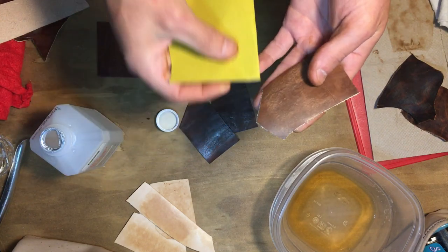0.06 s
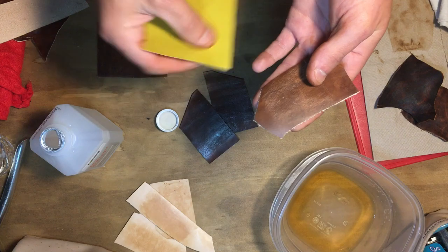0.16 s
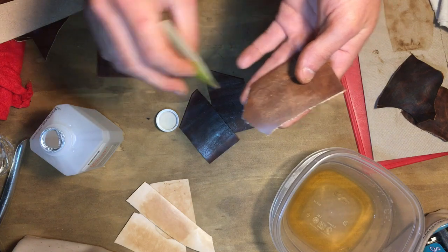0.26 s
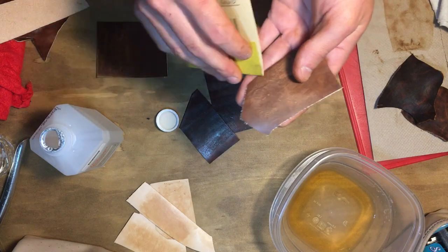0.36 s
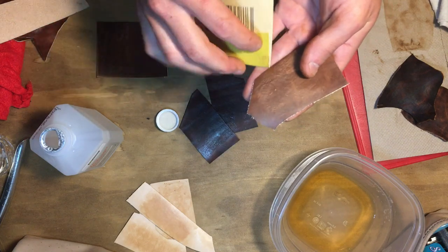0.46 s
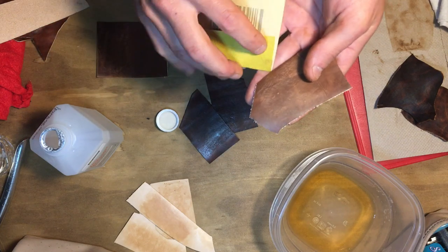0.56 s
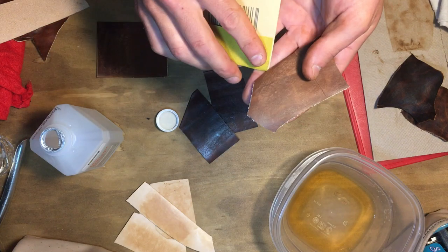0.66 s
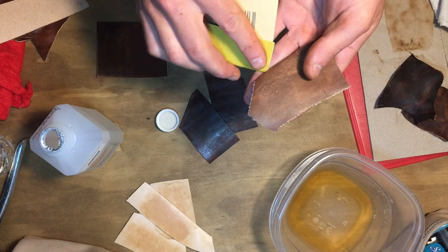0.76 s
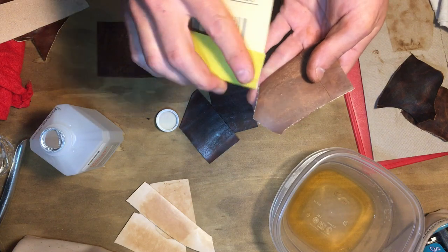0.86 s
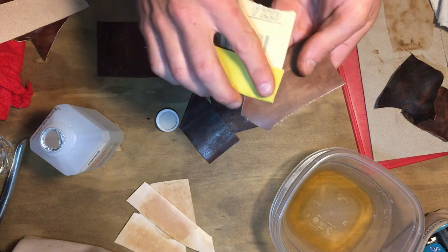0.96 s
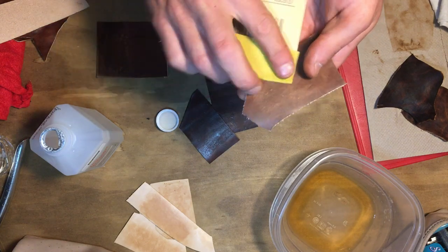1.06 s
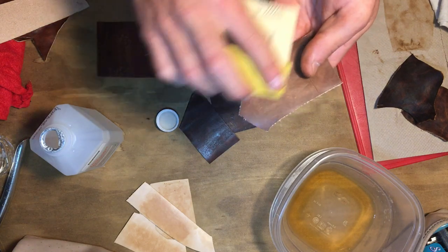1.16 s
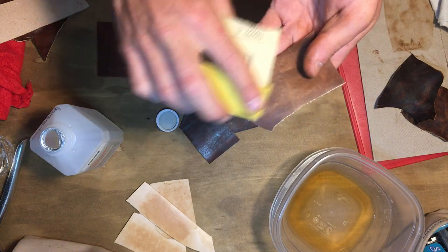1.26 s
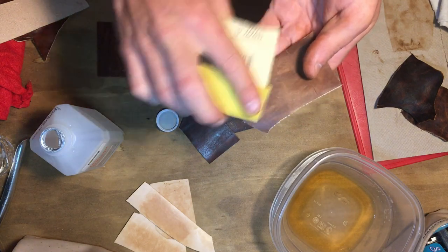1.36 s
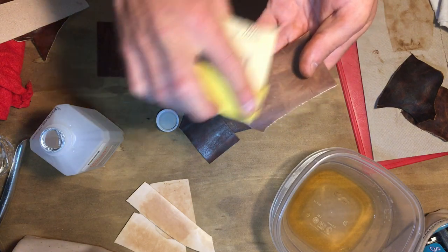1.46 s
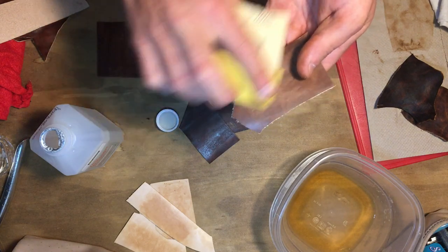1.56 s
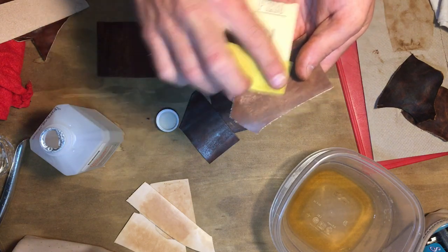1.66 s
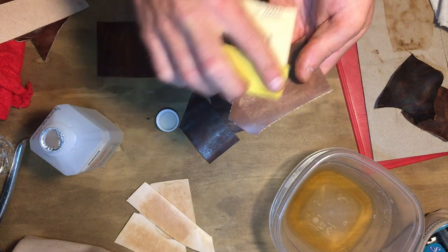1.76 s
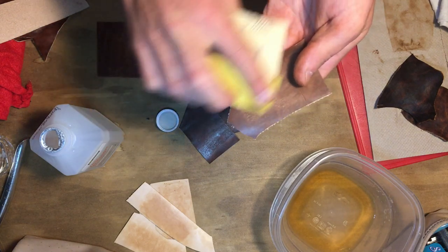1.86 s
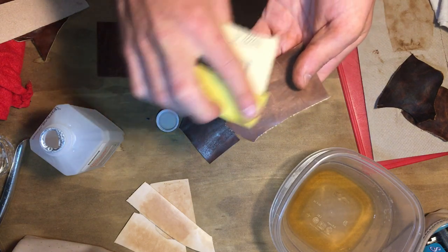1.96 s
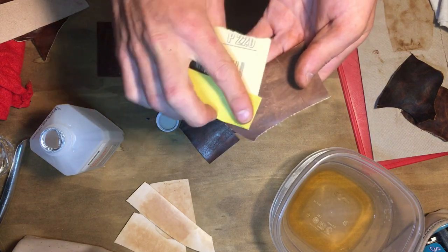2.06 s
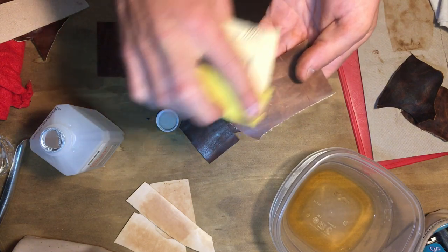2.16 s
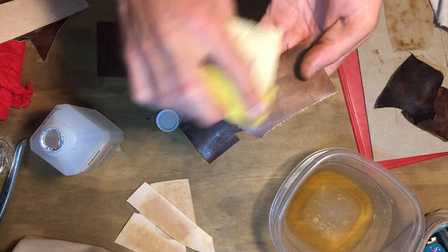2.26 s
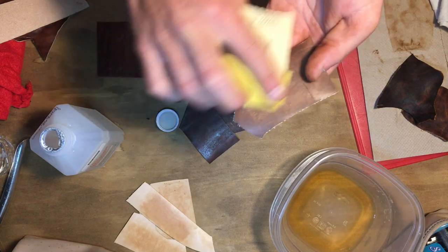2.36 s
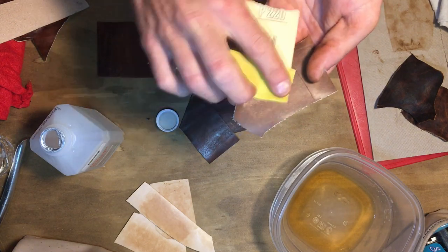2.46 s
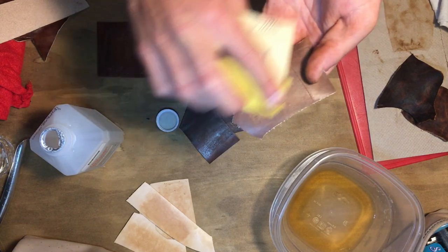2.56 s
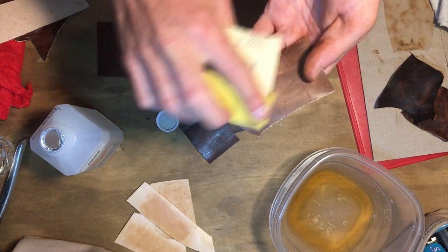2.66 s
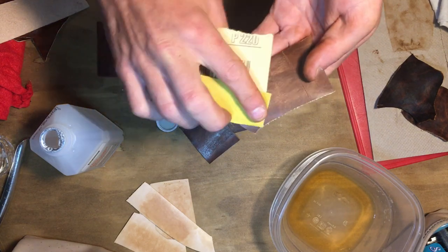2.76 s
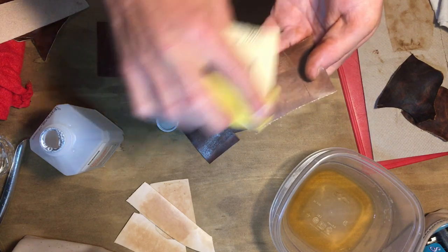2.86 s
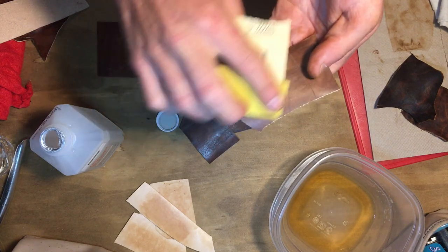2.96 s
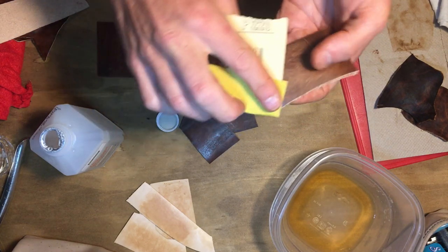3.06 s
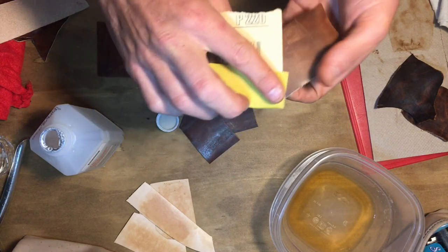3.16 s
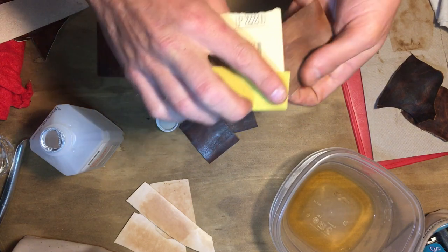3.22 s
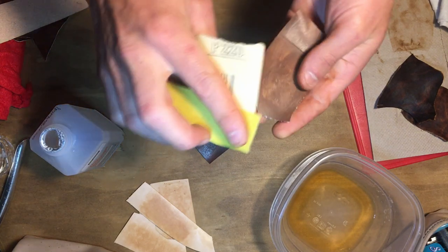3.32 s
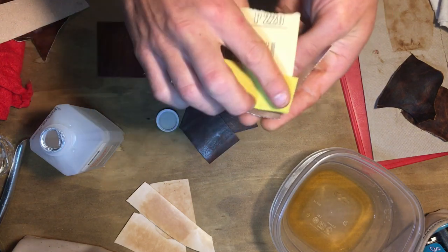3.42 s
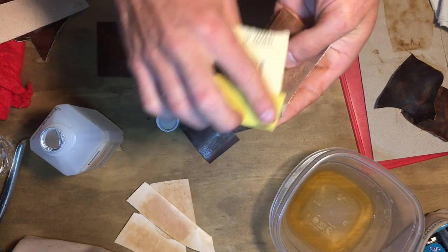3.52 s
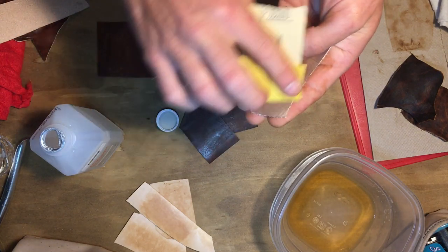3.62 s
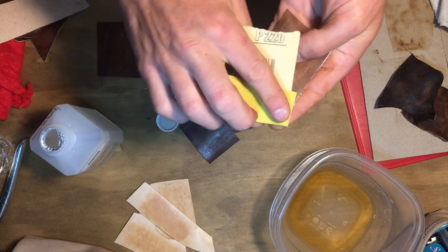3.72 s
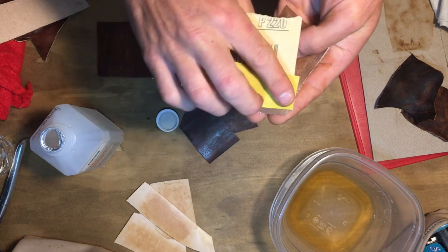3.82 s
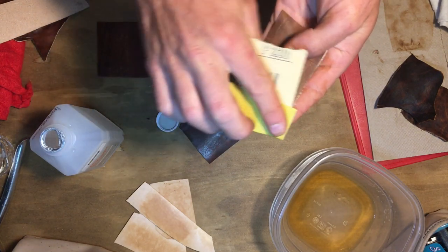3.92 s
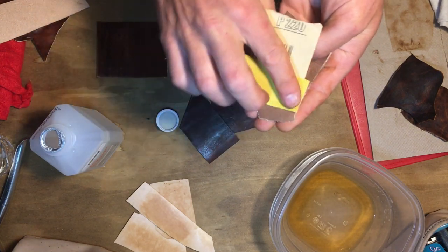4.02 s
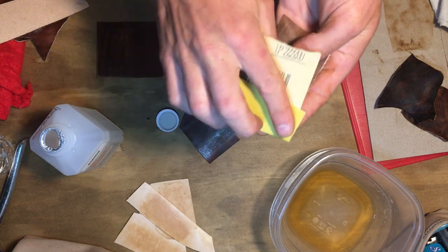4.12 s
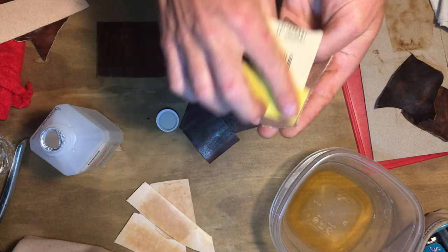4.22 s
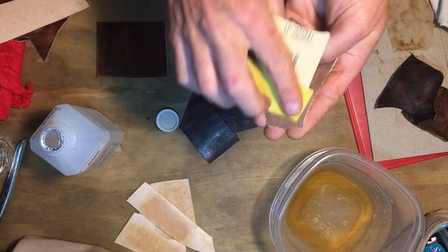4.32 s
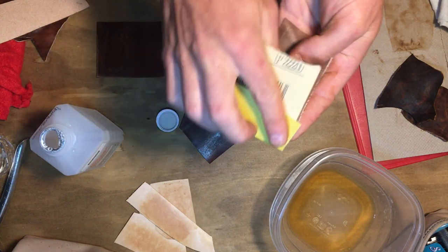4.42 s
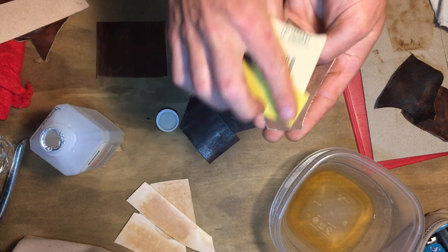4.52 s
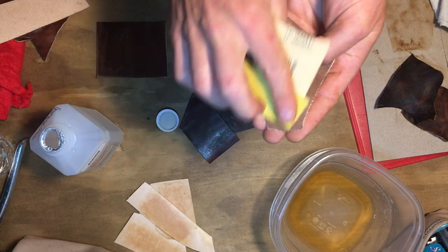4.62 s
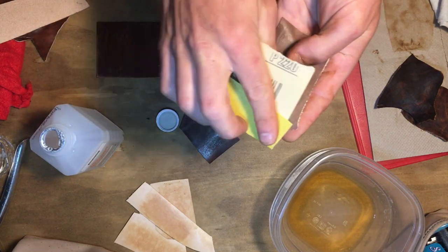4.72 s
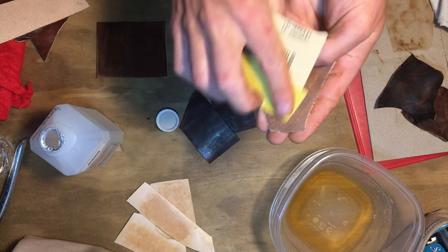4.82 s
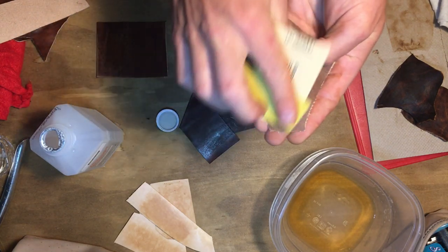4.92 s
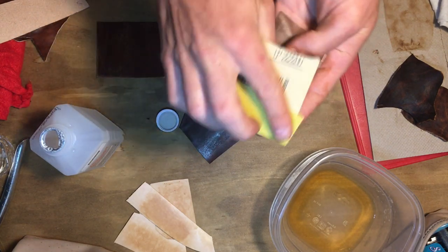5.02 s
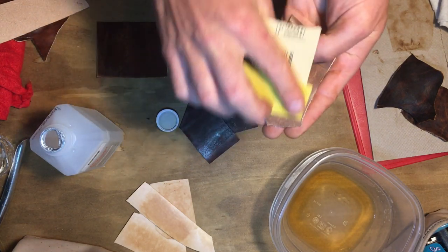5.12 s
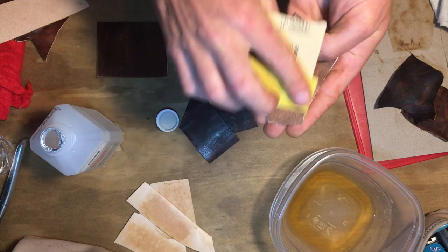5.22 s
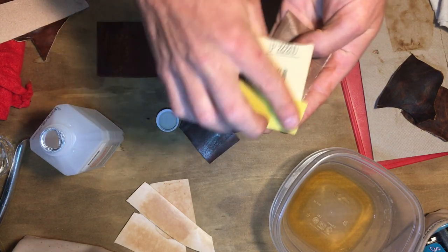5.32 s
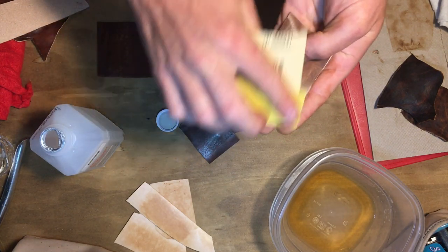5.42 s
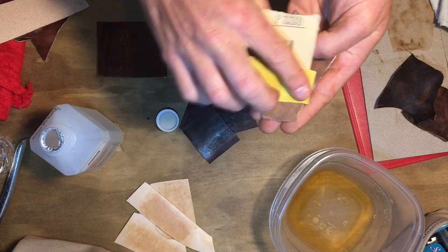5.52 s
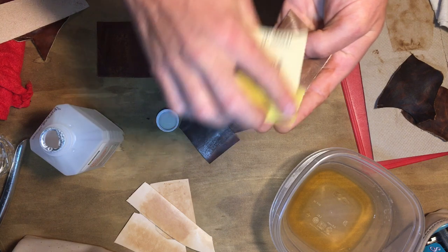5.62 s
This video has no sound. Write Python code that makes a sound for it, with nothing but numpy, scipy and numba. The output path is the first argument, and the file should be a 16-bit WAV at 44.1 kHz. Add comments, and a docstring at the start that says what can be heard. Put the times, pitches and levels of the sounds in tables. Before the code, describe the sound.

Sandpaper scrubs a piece of leather by hand in two quick runs, a bright dry hiss and then a slightly duller rasp.

```python
"""Folded sandpaper scrubs quickly over a hand-held piece of leather: a bright hiss on its face, then a
duller rasp on its edge. Countless grit impacts follow the speed of each stroke and ring the sheet.
Before each run the sheet is regripped: fingers brush it, it crinkles and slips, a loose corner buzzes.
Leather and hands knock softly at the turns. A small quiet workroom, heard from just above the bench."""
import sys
import numpy as np
from scipy import signal
from scipy.fft import rfft, irfft
from scipy.io import wavfile
from numba import njit

SR = 44100
rng = np.random.default_rng(int(sys.argv[2]) if len(sys.argv) > 2 else 0)


def unload_wav(signal):
    """Save mono or channel-first audio to the path in sys.argv[1] as 16-bit WAV at rate SR, clipped to [-1, 1]."""
    wavfile.write(
        sys.argv[1],
        SR,
        np.round(np.clip(np.atleast_2d(signal).T, -1, 1) * 32767).astype(np.int16),
    )


N = 250488
TIME = np.arange(N) / SR

# Fingers brush the sheet. Each row: start and end in seconds, level in dB, push, brightness in dB.
# Push runs from -1 to 1; above 0 the speed peaks early. Levels are set before each layer's trim.
BRUSHES = [(-.05, .14, -53, -0.013, 3.5), (.09, .2, -60.5, .1, -4), (.18, .298, -62, -0.35, 1),
           (.368, .532, -49.5, 0.31, 1), (.455, .492, -49.5, .4, -1), (.498, .526, -53.5, -.3, 5.5),
           (.524, .665, -49, 0.22, -1.5), (.661, .694, -48, 0.51, 9.5), (3.632, 3.672, -42.5, 0.26, -3)]
# The sheet crinkles in the grip. Each row: start in seconds, level in dB, brightness in dB.
CRINKLES = [(.013, -52, -12), (0.1, -55, 7.5), (0.231, -68, 2), (0.351, -59.5, 8), (.373, -49.5, 8),
            (.443, -50, 1), (.646, -44.5, 7)]
# The sheet slips on the leather. Each row: as for a brush, then its loose corner's pitch in Hz.
SLIPS = [(0.643, 0.862, -68, .1, 10.5, 5360), (0.73, 0.964, -69, -0.45, 7, 2260),
         (0.842, 0.886, -44, 0.39, 1.5, 2160), (0.918, 0.968, -59.5, .07, 11.5, 2400),
         (0.993, 1.046, -55, 0.22, 11, 2420), (3.047, 3.183, -65.5, .27, 13, 2470),
         (3.18, 3.253, -65.5, -.18, 8, 2170), (3.259, 3.317, -65, -0.26, 12, 2540),
         (3.288, 3.319, -47, 0, 8, 2520), (3.31, 3.59, -74.5, 0.022, 9, 3030),
         (3.488, 3.503, -58.5, .37, 2, 2420), (3.727, 3.779, -59.5, .45, 13, 2370)]
# Hand and leather knock. Each row: start in seconds, level in dB, weight in dB gained per octave down.
KNOCKS = [(0.65, -52, -11), (0.717, -58.5, -8), (0.851, -53, -4), (1.007, -56, -5), (1.072, -47.5, -13),
          (3.638, -58, -8), (3.832, -54.5, 0.5)]
# Modes of the held leather, highest first. Each row: pitch in Hz, level in dB.
LEATHER_MODES = [(368.6, -3), (204, -2), (120, -4)]

# Spells of scrubbing: even on the face, quickening on the edge but for one hesitation.
# Each row: start and end in seconds, rough tempo in strokes per second.
FACE_SPELLS = [(1.058, 1.488, 16.4), (1.489, 2.177, 17.4), (2.177, 2.650, 16.9), (2.650, 3.053, 17.4)]
EDGE_SPELLS = [(4.085, 4.257, 11.6), (4.257, 4.570, 12.7), (4.570, 5.091, 13.4), (5.091, 5.175, 12),
               (5.175, 5.724, 14.5)]
# How hard the hand bears down. Each row: time in seconds, level in dB, brightness in dB.
FACE_EFFORT = [(1.095, -37, -3.5), (1.15, -33.5, 0.5), (1.52, -35, 3), (2.09, -36, 2), (2.27, -36, 2.2),
               (2.38, -33.2, 1.7), (2.62, -35, 1.6), (2.84, -38, 1.5), (2.91, -35, 2), (2.97, -37, 0.5),
               (3.03, -37, -1.5)]
EDGE_EFFORT = [(4.12, -36.5, -4), (4.22, -37, -1.5), (4.45, -35, -2), (4.63, -39, -1), (4.8, -37, 1.8),
               (4.98, -36.5, -3.5), (5.06, -33.5, .5), (5.13, -35.5, -2.5), (5.21, -38, -1.5),
               (5.35, -35.5, 2), (5.43, -37.5, 1.4), (5.68, -32.3, -3.5)]
# The forward stroke, then the pull. Each row: pause before it in seconds, level offset in dB, push,
# brightness offset in dB.
FACE_PUSH_PULL = [(0.0022, 0.7, 0.1, 0.74), (0.00086, 0.5, 0.041, 1.3)]
EDGE_PUSH_PULL = [(0.00716, 0.46, 0.28, 1.3), (0.0021, -0.5, 0.0049, 1.5)]
# Single strokes find the edge before the rhythm sets in.
# Each row: start and end in seconds, level in dB, push, brightness in dB.
TRIAL_STROKES = [(3.548, 3.616, -38, -0.61, 0), (3.621, 3.677, -31.5, 0.49, 2.5),
                 (3.679, 3.744, -33.5, 0.14, 0.9), (3.816, 3.883, -45, 0.59, 6.5),
                 (3.903, 3.973, -36.5, -0.18, -2.2), (3.982, 4.074, -35.5, -0.23, -1.5)]

# Broad tone of the still room and of the sheet in each grip. Each row: frequency in Hz, gain in dB.
ROOM_COLOUR = [(20, -10), (45, -2.5), (80, -4), (125, 1), (170, -9.5), (300, -13), (600, -22.5),
               (1500, -21), (4000, -23), (9000, -30.5), (15500, -34)]
BRUSH_COLOUR = [(60, -19), (250, -6), (390, -1.5), (500, -9), (680, -9.5), (850, -10), (1700, -0.5),
                (2100, -3), (4200, -5.5), (5500, -9), (8800, -16.5), (12500, -15), (15600, -28)]
SLIP_COLOUR = [(120, -28), (200, -24), (350, -1.5), (470, -30), (700, -21), (820, -3), (1560, -1.5),
               (2380, -1.5), (3900, -1), (4400, -7.5), (6600, -14), (10200, -23), (12000, -20),
               (15500, -31)]
FACE_COLOUR = [(60, -48), (250, -27.5), (390, -13.5), (500, -32), (680, -35), (850, -17.5), (1700, -8.5),
               (2100, 2.5), (4200, -5), (5500, -3.5), (8800, -7.5), (12500, -12.5), (15600, -21)]
EDGE_COLOUR = [(60, -58), (250, -26.5), (390, -15), (500, -30.5), (680, -28.5), (850, -18.5), (1700, -11.5),
               (2100, 1), (4200, -6), (5500, -8), (8800, -11.5), (12500, -16.5), (15600, -23.5)]
# Resonances of the sheet and dips between the hands. Each row: centre and width in Hz, gain in dB.
BRUSH_PEAKS = [(975, 250, 7.1), (1310, 84, 5), (1980, 110, 2.9), (2490, 230, 3.9), (3280, 340, 4.8),
               (4120, 120, 7.1)]
SLIP_PEAKS = [(1986, 100, 10.5), (2390, 180, -4.5), (3300, 300, 1), (3720, 83, 3.5)]
FACE_PEAKS = [(1307, 75, 6.2), (1653, 120, -2.4), (1830, 106, -8), (2142, 168, -9.8), (2420, 90, 1.5),
              (2575, 73, -7.4), (2945, 61, -3.8), (3217, 58, 3.5), (3315, 51, -6), (4062, 431, 4),
              (4966, 188, -6), (5397, 509, -3.8), (6348, 178, -3)]
EDGE_PEAKS = [(1067, 48, -4.3), (1328, 74, 4.7), (1837, 64, -4.8), (2166, 130, -6.9), (2547, 144, -4.6),
              (2949, 57, -3.3), (3983, 100, 3), (4294, 110, 3.8), (4924, 310, -3.7), (5227, 101, 3.3),
              (6199, 91, -3.5)]
# The notch of the microphone port. Its one row: centre and width in Hz, gain in dB.
PORT_DIP = [(10270, 670, -6)]


def undb(db):
    """Decibels to gain."""
    return 10 ** (np.asarray(db) / 20)


def unit(x):
    """Scale to rms 1."""
    return x / np.sqrt(np.mean(x ** 2))


def add(out, start_s, sound):
    """Mix a sound in at start_s."""
    i = int(start_s * SR)
    out[i:i + len(sound)] += sound[:max(N - i, 0)]


def lowpass(x, hz, order=2):
    """Low-pass without delay, so that the rest of x is the matching high-pass."""
    return signal.sosfiltfilt(signal.butter(order, min(hz, SR / 2 - 1), fs=SR, output="sos"), x)


@njit
def resonator(x, hz, width_hz):
    """Band-pass whose centre may move every sample; gain 1 at the centre."""
    y, band, low = np.empty(len(x)), 0., 0.
    for i in range(len(x)):
        tuning, damping = np.tan(np.pi * hz[i] / SR), width_hz / hz[i]
        swing = (band + tuning * (x[i] + 1e-18 - low)) / (1 + tuning * (tuning + damping))
        band = 2 * swing - band
        low += 2 * tuning * swing
        y[i] = damping * swing
    return y


def ring(x, colour, peaks=(), size=8192):
    """Pass x through a body of unit power with a broad colour and narrow peaks or dips."""
    hz = np.maximum(np.arange(size // 2 + 1) * SR / size, 1)
    colour_hz, colour_db = np.array(colour).T
    db = np.interp(np.log(hz), np.log(colour_hz), colour_db)
    for centre, width, height in peaks:
        db += height * np.exp(-2 * ((hz - centre) / width) ** 2)
    # minimum phase: the body rings only after it is struck
    cepstrum = irfft(np.log(undb(db)))
    cepstrum[1:size // 2] *= 2
    cepstrum[size // 2 + 1:] = 0
    response = irfft(np.exp(rfft(cepstrum)))
    return signal.fftconvolve(x, response / np.linalg.norm(response))[:N]


def wander(rate):
    """A random drift with a spread near 1, turning rate times a second."""
    return np.interp(TIME * rate, np.arange(N), rng.standard_normal(N))


def grit(rate, spread_db):
    """Grains catch at random, rate times a second; a positive spread makes a few much harder."""
    caught = rng.random(N) < rate / SR
    return unit(caught * rng.standard_normal(N) * undb(spread_db * rng.exponential(size=N)))


def rub(strokes, impacts, speed_powers, catch_db, overrun_s):
    """Each stroke speeds up and stops; slow sliding is dull, fast sliding snaps the fibres sharply."""
    low = lowpass(impacts, hz=1700, order=6)
    top = impacts - lowpass(impacts, hz=5200)
    mid = impacts - low - top
    low_power, mid_power, top_power = speed_powers
    out = np.zeros(N)
    for start, end, db, push, bright_db in strokes:
        start, end = start - overrun_s, end + overrun_s  # the soft sheet creeps beyond the hand's travel
        on = (TIME > start) & (TIME < end)
        progress = (TIME[on] - start) / (end - start)
        speed = np.abs(np.sin(np.pi * (progress + push * progress * (1 - progress))))
        bite = np.sin(np.pi / 2 * speed) ** 2  # the grains bite once sliding, then the drag levels off
        body = low[on] * bite ** low_power + mid[on] * bite ** mid_power
        sizzle = undb(bright_db) * top[on] * bite ** top_power
        out[on] += undb(db) * (body + sizzle)
    return out * undb(catch_db * wander(260))  # the drag is never even along a stroke


def room_tone(rumble_db=-67, hum_hz=125.7, hum_db=-78):
    """Low room rumble with a faint mains hum."""
    rumble = unit(ring(rng.standard_normal(N), ROOM_COLOUR)) * undb(0.23 * wander(4.7))
    hum = np.sqrt(2) * np.sin(2 * np.pi * hum_hz * TIME)
    return undb(rumble_db) * rumble + undb(hum_db) * hum


def regripping(crinkle_s=.018, crinkle_push=.25):
    """Fingers slide over the sheet, and its creases crinkle in short bursts."""
    crinkles = [(start, start + crinkle_s, db, crinkle_push, bright) for start, db, bright in CRINKLES]
    creases = grit(rate=12000, spread_db=1.9)
    drag = rub(BRUSHES + crinkles, creases, speed_powers=(.67, .88, .96), catch_db=1.5, overrun_s=.0005)
    return undb(-2) * ring(drag, BRUSH_COLOUR, BRUSH_PEAKS)


def sheet_slips():
    """The sheet settles on the leather in small gritty jerks."""
    jerks = [slip[:-1] for slip in SLIPS]
    grains = grit(rate=11000, spread_db=-1.2)
    drag = rub(jerks, grains, speed_powers=(.42, .69, .98), catch_db=-1, overrun_s=.001)
    return undb(-1.5) * ring(drag, SLIP_COLOUR, SLIP_PEAKS)


def corner_buzz(pushes, width_hz=600., slip_db=-1, push_db=-11, push_hz=4050, push_s=.029):
    """Grit rings a loose corner of the sheet through each slip, and briefly as a push meets the edge."""
    buzzes = [(start, end, db + slip_db, hz) for start, end, db, _, _, hz in SLIPS]
    buzzes += [(start, start + push_s, db + push_db, push_hz) for start, _, db, _, _ in pushes]
    grains = grit(rate=3000, spread_db=2)
    out = np.zeros(N)
    for start, end, db, hz in buzzes:
        on = (TIME > start) & (TIME < end)
        pitch = np.full(on.sum(), float(hz))
        corner = resonator(resonator(grains[on], pitch, width_hz), pitch, width_hz)
        swell = np.sin(np.pi * (TIME[on] - start) / (end - start))
        out[on] += undb(db) * swell * unit(corner)
    return out


def thud(hz, rise_s, decay_s):
    """One damped, slightly ragged mode of leather bumping on fingers."""
    t = TIME[:SR // 8]
    stray = np.cumsum(rng.standard_normal(len(t))) * np.sqrt(170 / SR)  # soft contact blurs the pitch
    swell = (1 - np.exp(-t / rise_s)) * np.exp(-t / decay_s)
    return np.sqrt(2) * np.sin(2 * np.pi * hz * t + stray) * swell / swell.max()


def leather_knocks(strokes, turn_db=-33, turn_hz=385, turn_lag_s=.00895):
    """The leather bumps the fingers when pressed down, and lightly as each stroke takes hold."""
    out = np.zeros(N)
    for start, db, weight in KNOCKS:
        for hz, mode_db in LEATHER_MODES:
            octaves_down = np.log2(LEATHER_MODES[0][0] / hz)
            gain = undb(db + mode_db + weight * octaves_down)
            add(out, start, gain * thud(hz, rise_s=.0007, decay_s=.019))
    for start, _, db, _, _ in strokes:
        add(out, start + turn_lag_s, undb(db + turn_db) * thud(turn_hz, rise_s=.00078, decay_s=.0034))
    return out


def scrub_strokes(spells, effort, push_pull, level_scatter_db=.7, push_scatter=.11, top_scatter_db=1.06):
    """The hand goes back and forth at each spell's tempo, no two strokes quite alike."""
    spans = []
    for start, end, tempo in spells:
        count = max(round((end - start) * tempo), 1)
        turns = np.linspace(start, end, count + 1)
        spans += zip(turns[:-1], turns[1:])
    times, levels, brightness = np.array(effort).T
    strokes = []
    for k, (start, end) in enumerate(spans):
        pause, db, push, bright_db = push_pull[k % 2]
        middle = (start + end) / 2
        db += np.interp(middle, times, levels) + rng.normal(0, level_scatter_db)
        push += rng.normal(0, push_scatter)
        bright_db += np.interp(middle, times, brightness) + rng.normal(0, top_scatter_db)
        strokes.append((start + pause, end, db, push, bright_db))
    return strokes


def hand_reflection(x, lag_s=.0014, sway=.2, share=.2):
    """The moving hand reflects the sound, so the fine colour shifts from stroke to stroke."""
    lag = lag_s * np.exp(sway * wander(7))
    return x + share * np.interp(TIME - lag, TIME, x)


def sanding_face(strokes):
    """Flat on the leather many grains bite at once: a fine, bright hiss."""
    grains = grit(rate=36000, spread_db=.84)
    drag = rub(strokes, grains, speed_powers=(.77, 1.32, 1.95), catch_db=0, overrun_s=.0017)
    return undb(-2.13) * ring(hand_reflection(drag), FACE_COLOUR, FACE_PEAKS)


def sheet_flex(x, strokes, push_start_hz=4670, push_end_hz=1970, pull_hz=3120., mix_db=-8.5):
    """The sheet's free part lengthens on each push, so its resonance falls; on the pull it holds."""
    hz = np.full(N, pull_hz)
    for start, end, *_ in strokes[::2]:
        on = (TIME > start) & (TIME < end)
        hz[on] = np.geomspace(push_start_hz, push_end_hz, on.sum())
    waver = np.exp(.03 * wander(16))
    return x + undb(mix_db) * resonator(x, hz * waver, width_hz=350.)


def sanding_edge(strokes):
    """On the narrow edge fewer grains bite: a coarser, duller rasp."""
    grains = grit(rate=28000, spread_db=0)
    drag = rub(strokes, grains, speed_powers=(.91, 1.9, 2.24), catch_db=-.9, overrun_s=.0042)
    flexed = sheet_flex(drag, strokes)
    return undb(-2.2) * ring(hand_reflection(flexed), EDGE_COLOUR, EDGE_PEAKS)


def room_echo(x, wet_db=-14.5, t60_s=.12, damp_hz=13700, build_s=.0031):
    """A short, softened echo from the bench and walls."""
    t = TIME[:SR // 2]
    envelope = np.exp(-np.log(1000) * t / t60_s) * (1 - np.exp(-t / build_s))
    tail = lowpass(rng.standard_normal(len(t)), damp_hz, order=1) * envelope
    return undb(wet_db) * signal.fftconvolve(x, tail / np.linalg.norm(tail))[:N]


def scene():
    """All the handwork and its echo over a bed of room tone, in mono."""
    face = scrub_strokes(FACE_SPELLS, FACE_EFFORT, FACE_PUSH_PULL)
    edge_run = scrub_strokes(EDGE_SPELLS, EDGE_EFFORT, EDGE_PUSH_PULL)
    edge = TRIAL_STROKES + edge_run
    work = sanding_face(face) + sanding_edge(edge)
    work += sheet_slips() + regripping() + corner_buzz(edge_run[::2]) + leather_knocks(face + edge)
    return (work + room_echo(work) + room_tone())[None]


def record(dry, top_hz=15850):
    """The microphone port notches the treble; the recorder cuts the top steeply."""
    ported = ring(dry[0], colour=[(1, 0), (SR / 2, 0)], peaks=PORT_DIP)
    top_cut = signal.ellip(10, .2, 70, top_hz, fs=SR, output="sos")
    return signal.sosfilt(top_cut, ported)[None]


dry = scene()
out = record(dry)
unload_wav(out)
```